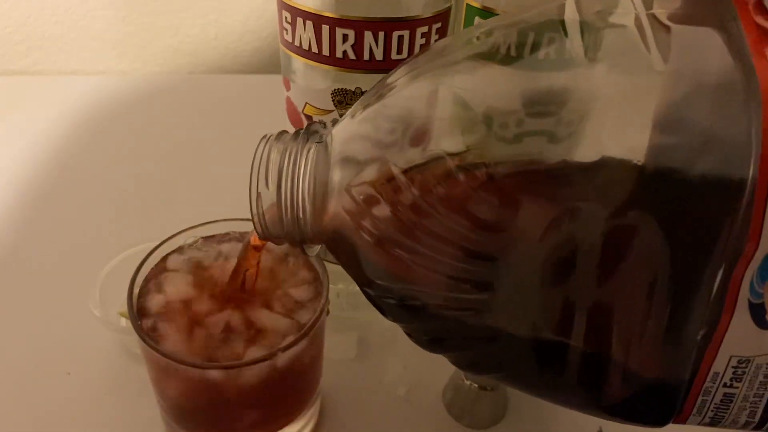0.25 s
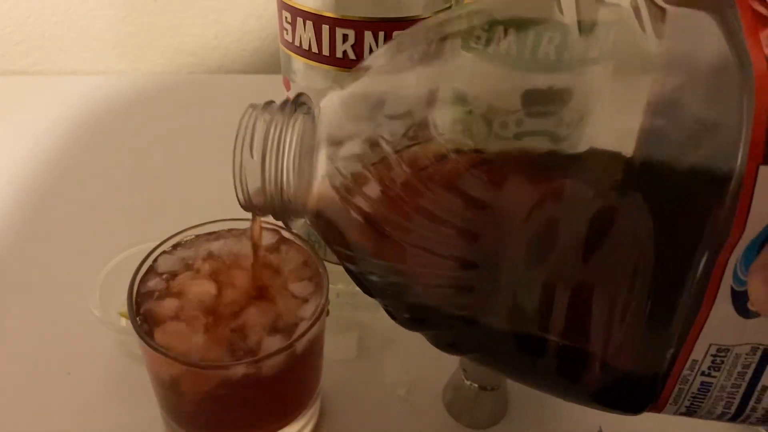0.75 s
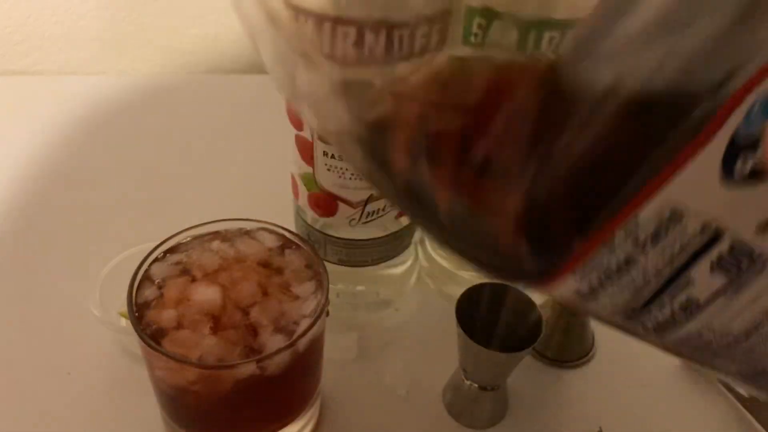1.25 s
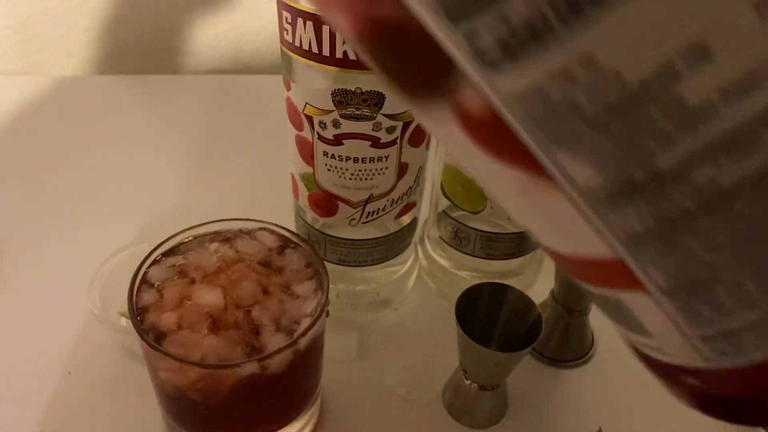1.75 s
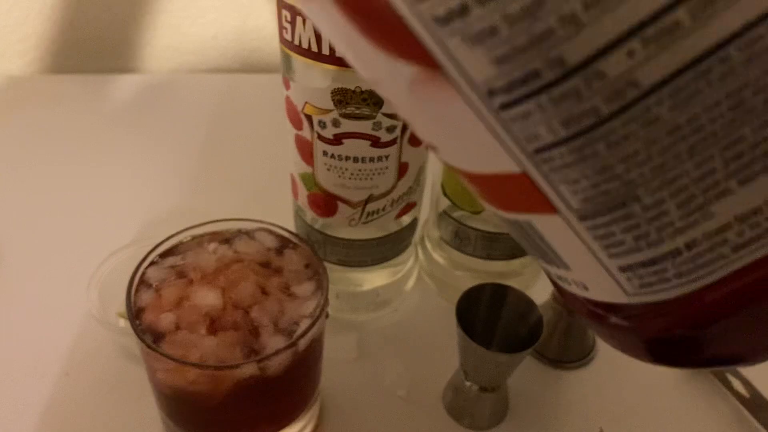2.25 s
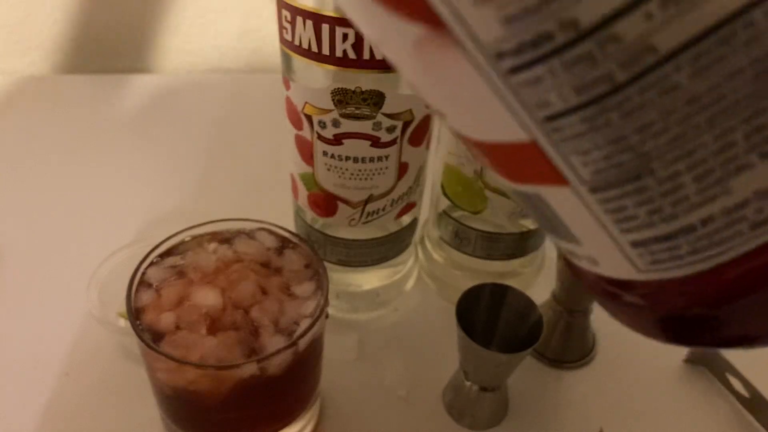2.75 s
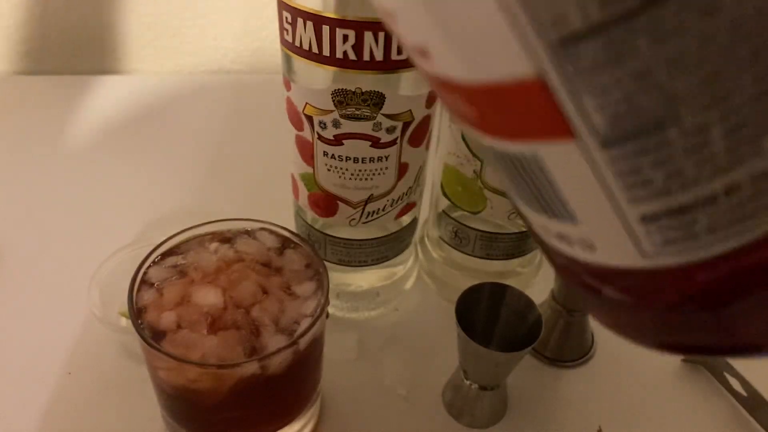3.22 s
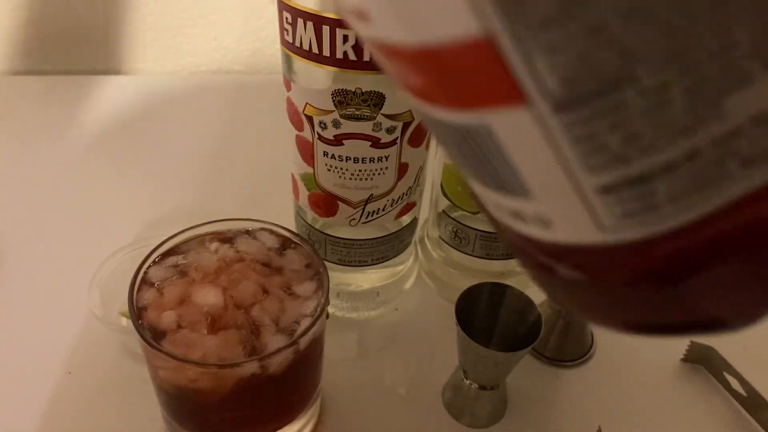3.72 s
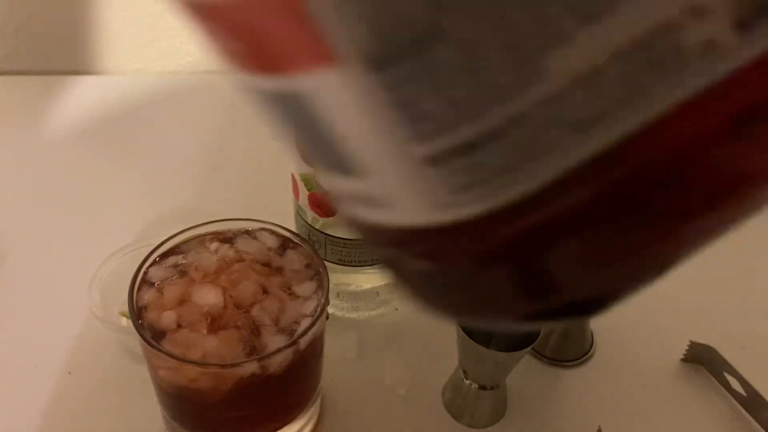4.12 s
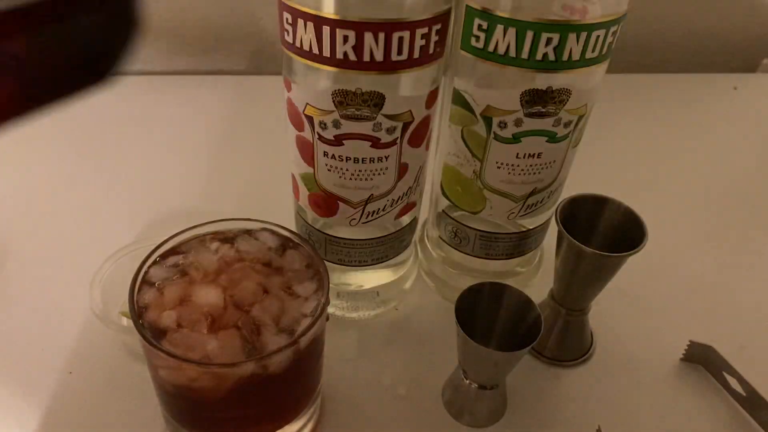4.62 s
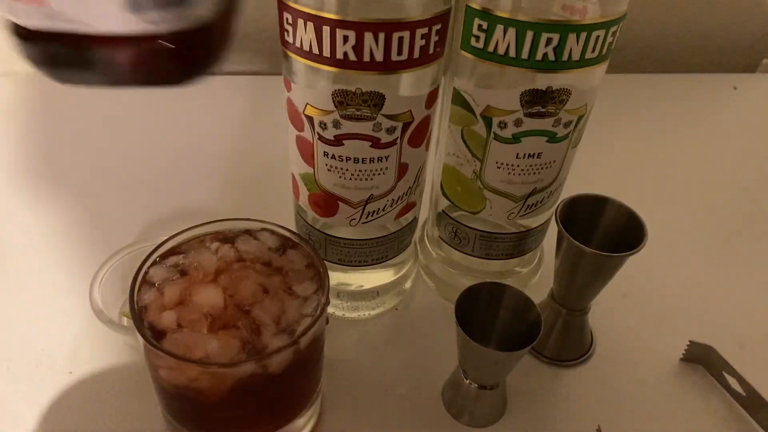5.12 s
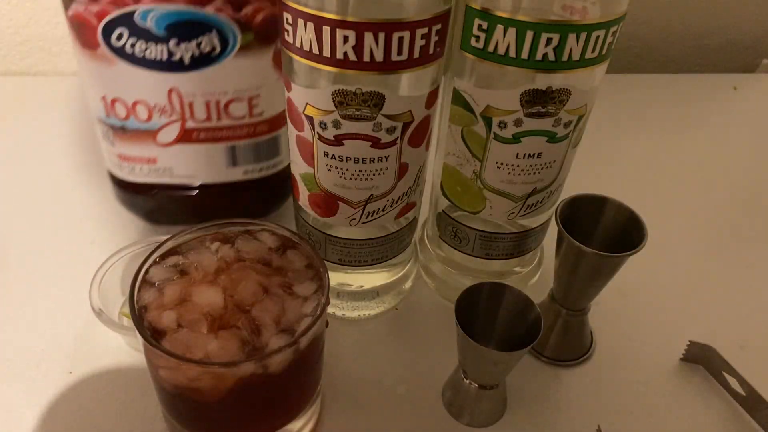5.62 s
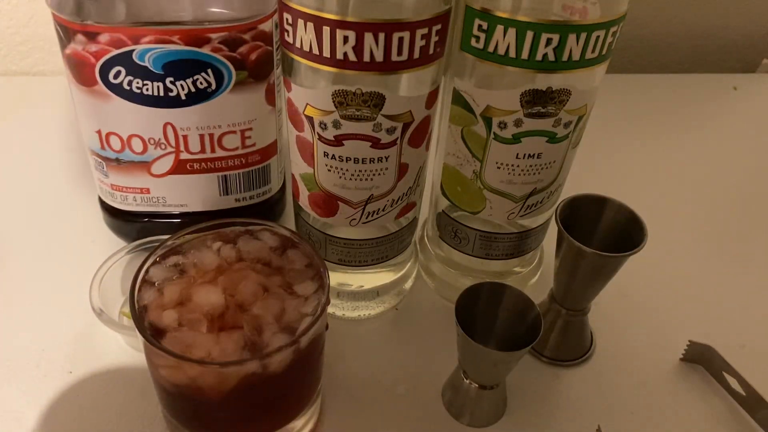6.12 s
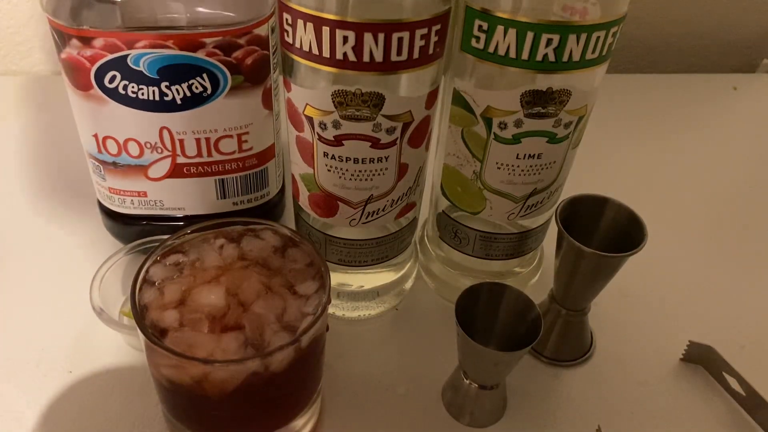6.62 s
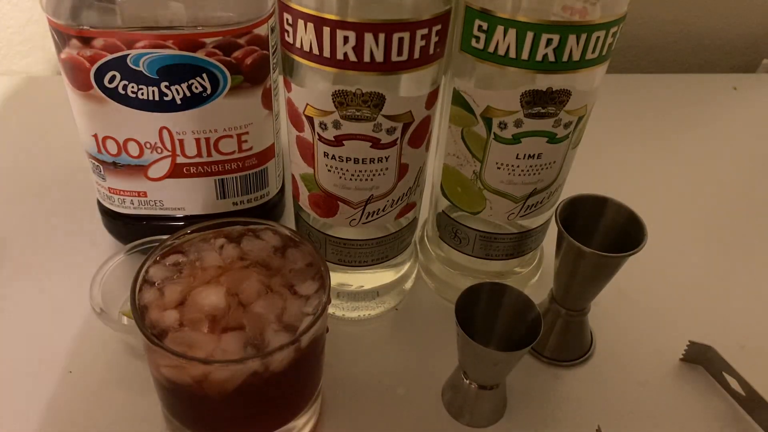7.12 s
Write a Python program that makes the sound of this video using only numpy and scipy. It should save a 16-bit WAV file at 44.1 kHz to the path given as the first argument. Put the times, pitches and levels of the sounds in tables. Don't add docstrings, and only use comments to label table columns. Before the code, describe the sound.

Heard close, slightly left: juice trickles over ice with bubbly plinks and crackles, then stops. Hands handle a plastic bottle, a cap clicks on, hollow knocks and skin rubs follow, and a hard twist ends in a bright snap. A brief pause with a dull creak, a low boom as the bottle lands, and several light ringing metal touches. A quiet fridge hums throughout the short-echoing room.

```python
import sys
import numpy as np
from scipy import signal
from scipy.fft import rfft, irfft
from scipy.io import wavfile

SR = 44100
rng = np.random.default_rng(int(sys.argv[2]) if len(sys.argv) > 2 else 0)


def rack_gain(trim_db):
    fader = np.asarray(trim_db, float)
    return 10 ** (fader / 20)


def digitize_waveform(pressure):
    field = np.atleast_2d(pressure).T
    bounded = np.clip(field, -1, 1)
    quanta = np.round(bounded * 32767).astype(np.int16)
    wavfile.write(sys.argv[1], SR, quanta)


N = 325017


def rms_one(x):
    return x / np.sqrt(np.mean(x ** 2) + 1e-20)


def in_time(rows, quiet_db=-130):
    s, *columns = np.transpose(rows)
    return [np.interp(np.arange(N) / SR, s, c, quiet_db, quiet_db) for c in columns]


def at_hz(points, hz):
    points_hz, level_db = np.transpose(points)
    return np.interp(np.log(hz + 1), np.log(points_hz), level_db)


def colour(x, points):
    gain = rack_gain(at_hz(points, np.fft.rfftfreq(N, 1 / SR)))
    return irfft(rfft(x) * gain, N)


def drift(rate):
    r = np.exp(-80 * np.pi * rate / SR)
    slow = signal.lfilter([1], [1, -2 * r, r * r], rng.standard_normal(N // 40 + 2002))[2000:]
    return np.interp(np.arange(N) / 40, np.arange(len(slow)), rms_one(slow))


def ring(x, hz, width_hz):
    r, w = np.exp(-np.pi * width_hz / SR), 2 * np.pi * hz / SR
    return signal.lfilter([0, np.sin(w)], [1, -2 * r * np.cos(w), r * r], x + 1e-18)


def width_of(t60):
    return np.log(1000) / np.pi / t60


def body(x, modes, spread_db=0., widen=0.9):
    out = 0
    for k, (hz, width_hz, db) in enumerate(modes):
        strength = rack_gain(db + spread_db * rng.standard_normal()) * (-1) ** k
        out = out + strength * ring(x, hz, width_hz * widen)
    return out


def burst(rise_s, fall_s, size=3200):
    t = np.arange(size) / SR
    swell = (1 - np.exp(-t / rise_s)) * np.exp(-t / fall_s)
    return rng.standard_normal(size) * swell * np.cos(np.pi / 2 * t / t[-1])


def bubble(hz, t60, rise, size=1500):
    t = np.arange(size) / SR
    tone = np.sin(2 * np.pi * hz * (t + rise * t ** 2))
    return tone * rack_gain(-60 * t / t60) * (1 - np.exp(-t / 0.00028))


def add(out, s, db, piece):
    i = round(s * SR)
    out[i:i + len(piece)] += (rack_gain(db) * piece / np.abs(piece).max())[:N - i]


# [f/Hz, likeness 0-1]
LIKENESS = [(60, 0.93), (150, 1), (380, 0.56), (950, 0.035), (2380, 0.24), (5980, 1), (15000, 0.055)]


def banded_noise(spectrum, patchy_db, rate, size=N):
    out, together = 0, drift(rate / 4)
    edges = 22 * 2 ** np.arange(0, 10, .5)
    white = rng.standard_normal((2, 2, size))
    for k, (low, high) in enumerate(zip(edges, edges[1:])):
        band = signal.butter(2, [low, high], "band", fs=SR, output="sos")
        mid, side = signal.sosfilt(band, white[k % 2])
        alike = np.clip(at_hz(LIKENESS, np.sqrt(low * high)), 0, 1)
        gain = rack_gain(patchy_db * (0.2 * together + drift(rate)))[:size]
        out = out + gain * (np.sqrt(1 + alike) * mid + np.sqrt(1 - alike) * side * [[1], [-1]])
    out = np.pad(out, [(0, 0), (0, N - size)])
    return rms_one(colour(out, spectrum)) * np.sqrt(size / N)


# [f/Hz, level/dB]
FLOOR = [(12, -56), (20, -4), (65, -0.5), (127, -11), (146, -8.5), (177, -19), (328, -19.5), (388, -23),
         (660, -25), (802, -31), (1760, -44.5), (2200, -38), (2750, -44.5), (3250, -55), (4000, -45),
         (7000, -47), (16000, -33.5)]
# [f/Hz, width/Hz, level/dB rms]
WHINE = [(178.6, 4.4, -69), (2080, 360, -94), (2430, 230, -89.5), (3170, 220, -91.5), (4620, 22, -92),
         (6780, 7.4, -96.5), (7340, 8.2, -100.5)]


def kitchen_floor():
    white, hz = rng.standard_normal((3, N)), np.fft.rfftfreq(N, 1 / SR)
    peaks = 0
    for centre_hz, width, db in WHINE:
        peaks = peaks + rack_gain(db) / np.sqrt(width) / (1 + ((hz - centre_hz) / width) ** 2)
    whine = 140 * irfft(rfft(white[0] + 0.88 * white[1:]) * peaks, N)
    hiss = banded_noise(FLOOR, patchy_db=0.67, rate=3.5)
    hiss = colour(hiss, [(9000, 4.5), (11500, -6.5), (15500, -11), (16000, -17)])
    return rack_gain(-59) * hiss + whine


# [f/Hz, level/dB per harmonic]
BUZZ = [(500, -23), (1000, -23), (1500, -24), (2300, -1), (2800, -12), (3200, -1.5), (3700, -10),
        (4600, -15.5), (7000, -15), (9000, -25)]
# [multiple, level/dB]
PANEL_LIFT = [(36, 12), (37, 14), (42, 12), (54, 8)]


def buzz():
    turns_hz, wander, scatter_db = 58.95, 0.00017, 5
    scatter, phase = rng.standard_normal(1025), rng.random(1025)
    for multiple, db in PANEL_LIFT:
        scatter[multiple] = db / scatter_db
    harmonic = np.arange(1025)
    level = rack_gain(at_hz(BUZZ, turns_hz * harmonic) + scatter_db * scatter) * (harmonic < 160)
    turn = irfft(level * np.exp(2j * np.pi * phase))
    angle = np.cumsum(turns_hz * (1 + wander * drift(0.79))) / SR
    angle = angle + np.array([[0], [.004]])
    wave = np.interp(angle % 1 * 2048, np.arange(2048), rms_one(turn))
    return rack_gain(-75 + 2.5 * drift(12.5)) * wave


def room(x):
    t60_s, cut_hz = 0.23, 4540
    t = np.arange(SR // 2) / SR
    low, high = rng.standard_normal((2, 2, len(t))) * (1 - np.exp(-t / 0.00093))
    band = signal.butter(2, [120, cut_hz], "band", fs=SR, output="sos")
    low = signal.sosfilt(band, low) * rack_gain(-60 * t / t60_s)
    tail = low + 0.33 * high * rack_gain(-60 * t / t60_s / 0.84)
    tail = tail / np.sqrt(np.sum(tail ** 2) / 2)
    return signal.fftconvolve(x[None], tail, axes=1)[:, :N]


# [f/Hz, level/dB]
LEAN = [(60, -2.5), (130, 13), (290, 2), (640, 12), (1410, 3.5), (3100, 10), (6820, 1), (15000, -3.5)]


def lean(x, share, lag_s):
    hz = np.fft.rfftfreq(N, 1 / SR)
    early = np.exp(1j * np.pi * hz * lag_s / (1 + (hz / 1500) ** 2))
    half = rack_gain(share * at_hz(LEAN, hz) / 2) * early
    return irfft(rfft(x) * np.array([half, 1 / half]), N)


# [t/s, peak level/dB, upper modes level/dB]
CLINKS = [
    (6.3395, -47.5, -19.5),
    (6.5774, -28, -8.5),
    (6.6702, -34, -10),
    (6.755, -30, -9),
    (6.9107, -41.5, -8.5),
    (6.9396, -38.5, -15),
    (6.9714, -63, 5),
    (7.1367, -38.5, -13.5),
    (7.1906, -37, -13),
    (7.3544, -54.5, -17),
]
STEEL_HZ = [2164, 2293, 3806, 4264, 5150, 5911, 6304, 7075, 7327, 7714, 8554, 9600, 10430, 11560]
# [level/dB, t60/s]
STEEL = [(2, 0.28), (-6.5, 0.35), (-9.5, 0.17), (-7, 0.15), (-17, 0.067), (-27, .09), (-33, 0.05),
         (-15.5, 0.095), (-24, .08), (-28, 0.092), (-24.5, 0.15), (-16, 0.091), (-25, 0.086), (-28, 0.064)]


def steel():
    out, click = np.zeros(N), np.eye(1, 14000)[0]
    for s, db, upper_db in CLINKS:
        clink = 0
        for hz, (level_db, t60) in zip(STEEL_HZ, STEEL):
            upper = hz > 3000
            chance_db = .7 + .5 * upper + 2. * (hz > 5000)
            lift_db = (upper_db + 9.0) * upper + chance_db * rng.standard_normal()
            clink = clink + rack_gain(level_db + lift_db) * ring(click, hz, width_of(t60))
        add(out, s, db, clink)
        add(out, s, db - 2.5, -ring(ring(click[:2000], 1560, 460), 1330, 950))
        add(out, s, db - 22.0, ring(burst(0.0003, 0.009), 6000, 3000))
    return out


def shimmer():
    out = np.zeros(N)
    for s, db, upper_db in CLINKS:
        hiss = burst(0.00094, 0.031, size=6000)
        blur = 0.65 * ring(hiss, 5500, 200) + ring(hiss, 5600, 400) + 1.7 * ring(hiss, 7500, 450)
        add(out, s, db - 17.5 + 0.35 * upper_db, blur)
    return out


# [t/s, peak level/dB, ring f/Hz, rattle level/dB]
THUDS = [
    (5.88, -22, 151, -17),
    (5.922, -49, 61.4, -7),
    (5.964, -38, 152, -19),
    (6.006, -44.5, 180, -16),
    (6.087, -47.5, 114, -4.5),
    (6.203, -49.5, 61.9, -6.5),
    (6.292, -46, 190, -10),
    (6.386, -31.5, 188, -10),
]


def counter():
    out, t = np.zeros(N), np.arange(8000) / SR
    for s, db, hz, rattle_db in THUDS:
        rough = burst(0.01, 0.018, size=8000)
        push = (.003 - t) / 0.00078 * np.exp(-((t - .003) / 0.00077) ** 2)
        blow = push + .5 * rough
        boom = ring(blow, hz, 36) + 0.92 * ring(blow, 263, 84) + 0.63 * ring(blow, 427, 160)
        add(out, s, db, boom + 1.26 * ring(rough, 59.2, 9.1))
        add(out, s, db + rattle_db, ring(ring(burst(0.001, 0.018), 640, 2300), 900, 4100))
    return out


# [t/s, level/dB, slips per s]
CREAK = [
    (4.99, -78, 90),
    (5.04, -55, 85),
    (5.16, -48.5, 78),
    (5.23, -65, 80),
    (5.324, -67, 81),
    (5.336, -68, 77),
    (5.45, -83, 114),
]
# [f/Hz, width/Hz, level/dB]
CREAK_BODY = [(265, 69, -6.5), (340, 84, -4.5), (484, 123, -8), (716, 99, -12.5), (960, 230, -11),
              (1770, 220, -9.5)]


def creak():
    db, per_s = in_time(CREAK)
    turns = np.floor(np.cumsum(np.abs(per_s) * (1 + 0.075 * drift(40))) / SR)
    slips = np.diff(turns, prepend=0) * rack_gain(2.0 * rng.standard_normal(N))
    slips = slips + 0.1 * rng.standard_normal(N)
    return rack_gain(db) * rms_one(ring(body(slips, CREAK_BODY), 520, 1670))


# [t/s, peak level/dB, centre f/Hz, width/Hz, length/s]
SCUFFS = [(1.449, -41.5, 1550, 1200, 0.0041), (1.72, -37, 1500, 120, 0.0086),
          (1.955, -29.5, 2140, 250, 0.002), (1.956, -30, 736, 130, 0.0039), (2.208, -45, 3080, 500, 0.0039),
          (2.513, -49.5, 1790, 900, 0.032), (2.69, -34.5, 1150, 300, 0.0061),
          (2.872, -53, 1300, 500, 0.0035), (2.9, -44, 1930, 200, 0.002), (2.938, -50, 1290, 1500, 0.0017),
          (3.057, -51.5, 2060, 400, 0.085), (3.095, -42.5, 2150, 1200, 0.14),
          (3.134, -30, 3400, 1500, 0.0042), (3.175, -37.5, 2010, 250, 0.0039),
          (3.189, -44, 2100, 500, 0.0078), (3.351, -44.5, 2800, 3500, 0.0036),
          (3.377, -32, 2580, 3000, 0.0027), (3.386, -29.5, 740, 250, 0.0031),
          (3.732, -52.5, 2980, 1500, 0.0045), (4.208, -43, 2670, 800, 0.0055),
          (4.316, -44, 3020, 3000, 0.017), (4.342, -42, 4020, 4000, 0.0055),
          (4.372, -31, 3000, 3000, 0.0028), (4.246, -52, 2200, 1200, 0.003), (4.16, -54, 11000, 5000, .004),
          (4.423, -27.5, 3430, 2500, 0.0012), (5.882, -35, 1040, 500, 0.0065),
          (6.375, -49, 2000, 2010, 0.011), (1.779, -30.5, 744, 180, 0.0033), (4.43, -53, 3120, 1500, 0.04),
          (1.719, -33, 3250, 400, 0.0022), (2.041, -40, 790, 250, 0.0051)]
# [t/s, peak level/dB, centre f/Hz, width/Hz, length/s]
NUDGES = [
    (5.333, -48, 350, 66, .02),
    (6.7, -47.5, 330, 110, 0.015),
    (6.6, -56, 5600, 1200, 0.0043),
    (7.2, -49, 1400, 1400, 0.027),
    (7.7, -54, 5700, 6800, 0.011),
]


def scuffs(rows):
    out = np.zeros(N)
    for s, db, hz, width_hz, length_s in rows:
        add(out, s, db, ring(burst(0.35 * length_s, length_s, size=6000), hz, width_hz))
    return out


# [t/s, level/dB]
RUB = [
    (1.6, -71),
    (2.12, -39.5),
    (2.29, -73),
    (2.69, -43.5),
    (3.13, -48),
    (3.52, -58),
    (4.21, -52.5),
    (4.34, -32),
    (4.7, -75),
]
# [f/Hz, width/Hz, level/dB]
WALL = [(435, 40, 12.5), (738, 2.5, -9), (930, 23.2, -26)]
CAP = [(1330, 138, 7.5), (1576, 27, -5), (1937, 39, -2.5), (2560, 62.6, -36), (2650, 180, -30.5),
       (3395, 61, -10.5)]
JUICE = [(70, 50, 5.5), (120, 58, 4), (180.5, 29.6, -6.5), (207, 67, -7)]


def rub():
    press_db, = in_time(RUB)
    slips = rng.standard_normal(N) * rack_gain(4.6 * drift(79))
    cap = body(slips, CAP, widen=6.0) + 1.05 * ring(slips, 3200, 2800)
    plastic = body(slips, WALL, widen=7.3) + rack_gain(0.5) * cap
    juice_db = -57 + 0.29 * (press_db + 52.5)
    return rack_gain(juice_db) * rms_one(body(slips, JUICE)) + rack_gain(press_db - 12.5) * rms_one(plastic)


# [t/s, wall peak level/dB, ring f/Hz, cap rattle level/dB re wall]
GRIPS = [(1.778, -34, 737, -6.5), (2.039, -32, 364, -5), (2.069, -38, 461, -9), (2.093, -42.5, 706, 7.5),
         (2.113, -41.5, 353, -12), (2.189, -44.5, 320, -13), (2.209, -37, 462, 2), (2.501, -36, 413, -5),
         (2.511, -35, 620, -7), (2.526, -40, 340, -6), (2.579, -42.5, 331, -20), (2.614, -36.5, 411, -40),
         (2.682, -38, 250, 4.5), (2.7, -31, 479, -15), (2.723, -48, 500, -29), (2.897, -41.5, 464, -24),
         (2.943, -37.5, 456, -34), (3.072, -44, 360, -20), (3.107, -43.5, 590, -22),
         (3.198, -37, 430, -0.5), (3.355, -27, 422, -1), (3.382, -23, 738, 0), (3.408, -41.5, 460, 0),
         (3.451, -39.5, 296, -6), (3.475, -33, 404, -13), (3.735, -59, 243, 8.5), (3.817, -44.5, 265, -18),
         (3.838, -49, 494, -3.5), (3.94, -44, 282, -26), (3.959, -37, 374, -13.5)]
# [t/s, wall peak level/dB, ring f/Hz, snap level/dB re wall, cap rattle level/dB re wall]
CLACKS = [(1.45, -57.5, 1750, 23.5, -6), (1.72, -25, 420, -5, -8), (1.956, -33.5, 706, -10.5, 2),
          (3.135, -25, 507, -24.5, 0), (3.179, -31, 470, -13, 3.5), (3.495, -45.5, 407, 3, 3),
          (4.154, -48.5, 714, -31, 4), (4.162, -45, 505, -12.5, -7), (4.21, -50.5, 480, 3.5, 7),
          (4.225, -45.5, 496, -12.5, 2.5), (4.243, -36, 530, -8, 1), (4.318, -30.5, 637, 3, -4),
          (4.321, -35, 374, 8.5, -2), (4.34, -31, 256, 6, -7), (4.365, -42, 257, 14, -5),
          (4.373, -32, 254, 3, -6), (4.384, -42.5, 340, -12, -3), (4.398, -40, 256, 10, -14),
          (4.427, -35.5, 303, 5, -8)]
# [f/Hz, level/dB per Hz]
SNAP = [(1800, -17), (3000, -16.5), (5000, -4.5), (6700, -6.5), (8000, -6), (10500, -5), (13500, -19),
        (15500, -6), (16500, -23)]
# [t/s, peak level/dB]
SLOSHES = [(1.717, -33), (1.779, -44), (1.803, -36.5), (2.047, -26.5), (2.075, -36), (2.111, -27),
           (2.189, -40.5), (2.214, -39), (2.507, -33), (2.614, -33.5), (2.684, -31.5), (3.069, -46),
           (3.106, -54), (3.351, -50), (3.408, -34), (3.449, -36), (3.734, -30), (3.958, -54), (4.154, -50),
           (4.225, -42), (4.246, -35.5), (4.321, -30), (4.364, -39)]
# [t/s, peak level/dB, centre f/Hz, length/s]
TICKS = [
    (1.4496, -29, 4900, 0.0005),
    (1.719, -16.5, 3400, 0.00035),
    (3.482, -40.5, 2730, 0.0072),
    (3.496, -35.5, 3140, 0.0041),
    (4.235, -46, 5000, 0.0017),
    (4.421, -17, 6700, 0.0012),
    (5.877, -45.5, 3260, 0.0027),
    (4.4232, -13, 6550, 0.00063),
    (4.681, -45.5, 7300, 0.00026),
]


def bottle():
    dull, snaps = np.zeros(N), np.zeros(N)
    knocks = [(s, db, hz, rattle_db, -31) for s, db, hz, rattle_db in GRIPS]
    knocks += [(s, db, hz, rattle_db, snap_db) for s, db, hz, snap_db, rattle_db in CLACKS]
    for s, db, hz, rattle_db, snap_db in knocks:
        soft = np.clip(-snap_db / 40, .1, 1)
        blow = burst(0.00062 * soft, 0.011 * soft + 0.0028)
        late_s = .003 + 0.0024 * soft
        push = np.exp(-((np.arange(len(blow)) / SR - late_s) * hz * 4.2) ** 2) + soft * blow
        wall = ring(push, hz, 0.092 * hz) + 0.19 * ring(push, hz, 20.4)
        wall = wall + 1.27 * ring(blow, 516, 150) + 2.37 * ring(blow, 693, 154)
        add(dull, s, db + 3.0, wall)
        rattle = body(blow, CAP, spread_db=5.5, widen=5.9) + 0.19 * ring(blow, 1240, 1600)
        add(dull, s, db + rattle_db, rattle)
        snap_tail = signal.lfilter([.4], [1, -.6], burst(0.0041, 0.052))
        add(snaps, s, db + snap_db, burst(0.0017, 0.0019) + 0.096 * snap_tail)
    thuds = [(s, db - 11.5) for s, db, *_ in knocks]
    for s, db in SLOSHES + thuds:
        add(dull, s, db, body(burst(0.0027, 0.0083), JUICE, spread_db=2.0))
    dull += rack_gain(-1.5) * rms_one(colour(snaps, SNAP)) * np.sqrt(np.mean(snaps ** 2))
    for s, db, hz, length_s in TICKS:
        crack = burst(0.66 * length_s, length_s)
        squeak = ring(crack, hz, max(300, .8 / length_s))
        add(dull, s, db, 0.33 * squeak + 0.00053 / length_s * np.diff(crack, prepend=0))
    return dull


# [t/s, peak level/dB]
CRACKLE = [(0.0623, -42), (0.1017, -43), (0.1361, -48), (0.1635, -49), (0.188, -43), (0.214, -45),
           (0.2139, -35), (0.2518, -47), (0.2758, -47), (0.3077, -36), (0.3192, -44), (0.3676, -51),
           (0.368, -41), (0.4, -36), (0.4183, -43), (0.4189, -32), (0.4645, -40), (0.4888, -42),
           (0.5342, -48), (0.5591, -53), (0.5861, -51), (0.6255, -41), (0.6444, -45), (0.6828, -51),
           (0.702, -40), (0.7632, -44)]


def crackle():
    out = np.zeros(N)
    for s, db in CRACKLE:
        add(out, s, db, ring(np.diff(burst(.0002, 0.00051, size=601)), 5500, 4500))
    return out


# [t/s, peak level/dB, f/Hz]
DROPLETS = [(0.049, -57, 3200), (0.1, -47, 3850), (0.135, -52, 2260), (0.188, -47, 4400),
            (0.268, -44, 3270), (0.299, -56, 3400), (0.36, -43, 6500), (0.3676, -41, 6560),
            (0.534, -47, 1480), (0.561, -53, 1130), (0.5861, -47, 4400), (0.6474, -47, 6700),
            (0.6707, -44, 3250), (0.683, -47, 2540), (0.8415, -71, 4350), (0.8495, -57, 4310),
            (0.8714, -59, 3300), (0.8949, -51, 4200), (0.94, -56, 1550), (0.974, -37, 14700),
            (0.997, -50, 9000), (1.086, -54, 13000), (1.1063, -51, 3800), (1.143, -57, 1460),
            (1.252, -39, 9600), (1.3169, -62, 2050)]


def droplets():
    out = np.zeros(N)
    for s, db, hz in DROPLETS:
        click = np.diff(burst(0.0002, 0.00052, size=1501))
        add(out, s, db, bubble(hz, 0.018 * (2000 / hz) ** 0.34, rise=1.6) + 0.58 * click)
    return out


# [t/s, peak level/dB, from f/Hz, to f/Hz, length/s]
GLIDES = [(0.003, -52.5, 1550, 2650, 0.069), (0.064, -55, 1330, 1496, 0.086),
          (0.107, -48.5, 2900, 1516, 0.034), (0.27, -47, 4500, 5400, 0.014), (0.352, -64, 1500, 2050, .035),
          (0.365, -51, 4100, 4700, 0.013), (0.425, -48.5, 2500, 3370, 0.042), (0.45, -59, 4150, 4740, .04),
          (1.125, -69, 1380, 1390, 0.028), (.42, -46, 7100, 7950, .03), (0.255, -50.5, 1875, 1890, 0.023),
          (.556, -52, 2270, 2780, .022)]


def glides():
    out = np.zeros(N)
    for s, db, from_hz, to_hz, length_s in GLIDES:
        part = np.arange(int(length_s * SR)) / (length_s * SR)
        flutter = 1 + 2.9 * signal.lfilter([.06], [1, -.95], rng.standard_normal(4000))[:len(part)]
        tone = np.sin(2 * np.pi * np.cumsum(from_hz + (to_hz - from_hz) * part) / SR)
        add(out, s, db, np.sin(np.pi * part) ** 0.21 * flutter * tone)
    return out


# [t/s, f/Hz, level/dB]
GLASS_AIR = [
    (0, 719, -68),
    (.28, 726, -65.5),
    (.4, 860, -74),
    (.45, 1117, -74),
    (.75, 1167, -79),
    (.9, 1110, -101),
]


def glass_air():
    hz, db = in_time(GLASS_AIR)
    level = rack_gain(db + 4.0 * drift(17.0))
    return level * np.sin(2 * np.pi * np.cumsum(hz + 45 * drift(48)) / SR)


# [t/s, peak level/dB, f/Hz]
PLINKS = [(0.068, -47, 1360), (0.0605, -40, 2660), (0.073, -41, 2560), (0.1124, -32, 2660),
          (0.1225, -48, 2660), (0.1533, -36.5, 1390), (0.2508, -45, 3150), (0.2754, -42, 3340),
          (0.3186, -36, 6470), (0.3304, -41, 6500), (0.422, -40, 2530), (0.3774, -41, 6800),
          (0.3944, -44, 6250), (0.4103, -31, 7640), (0.4186, -36, 7340), (0.4504, -44, 4250),
          (0.4894, -34.5, 4580), (0.5361, -43.5, 4340), (0.5577, -40.5, 4240), (0.625, -40, 7260),
          (0.6813, -39.5, 4310), (0.7618, -43.5, 2560), (0.8101, -56, 3680), (1.0197, -48.5, 1420),
          (1.115, -53, 1390), (1.2815, -58, 3440), (1.3307, -56.5, 3850)]
ICE_TICKS = [(0.164, -33.5, 1620), (0.208, -31, 7260), (0.4337, -36, 7250), (0.4645, -30, 4560),
             (0.7028, -51, 2530), (0.7183, -52, 3360), (0.9174, -41, 3900), (0.925, -35.5, 6960),
             (0.9575, -41, 3420), (1.0077, -37, 6900), (1.071, -52, 3570), (1.201, -47, 7250),
             (1.2188, -45.5, 3580), (1.2516, -67, 2220), (1.4037, -44, 3100)]


def plinks_and_ice():
    out = np.zeros(N)
    for rows, tick_db in [(PLINKS, -10), (ICE_TICKS, 9)]:
        for s, db, hz in rows:
            tick = rack_gain(tick_db) * np.diff(burst(0.00031, 0.00077, size=1501))
            rough = 0.85 + 1.13 * signal.lfilter([.2], [1, -.9], rng.standard_normal(1500))
            add(out, s, db, bubble(hz, 0.028 * (2000 / hz) ** 0.52, rise=2.2) * rough + tick)
    return out


# [f/Hz, level/dB per Hz]
SPLASH = [(290, -68), (500, -23), (710, -19), (952, -7), (1390, -1.5), (2100, -8.5), (2610, 1),
          (5510, -1.5), (7380, -3.5), (8670, 2), (10200, -5), (15100, -28), (16500, -30)]
# [f/Hz, width/Hz, level/dB]
POCKETS = [(1390, 78, -3), (2660, 160, 0), (3030, 130, -4), (4580, 520, -4), (6500, 150, -4),
           (7800, 200, -3)]


def bubble_swarm():
    swarm, pour_end_s = np.zeros(N), 1.6
    for when, pitch, strength, life in rng.random((800, 4)):
        hz = 1150 * 7.0 ** pitch
        pocket_hz = min(POCKETS, key=lambda p: abs(np.log(p[0] / hz)))[0]
        hz = hz ** 0.5 * pocket_hz ** .55
        cycles = 5 + 70 * life ** 3
        add(swarm, pour_end_s * when, at_hz(SPLASH, hz) + 15 * strength ** 2, bubble(hz, cycles / hz, rise=3.8))
    fade_db = -58 - 15 * np.arange(N) / SR
    return swarm / np.std(swarm[:62000]) * rack_gain(fade_db)


# [t/s, level/dB]
POUR = [
    (0.0, -47.5),
    (0.158, -45.5),
    (0.18, -41.5),
    (0.418, -42.5),
    (0.778, -52.5),
    (1.42, -67),
]


def splash():
    splash_db, = in_time(POUR)
    noise = banded_noise(SPLASH, patchy_db=4.0, rate=200, size=66000)
    return rack_gain(splash_db - 14.5) * noise * rack_gain([[1.5], [-1.5]])


# [f/Hz, level/dB]
HELD_ECHO = [(500, 0), (1500, -2), (3500, -5), (5500, -17), (15000, -16)]


def scene():
    background = kitchen_floor() + buzz()
    clinks = steel() + shimmer()
    far = creak() + counter() + scuffs(NUDGES)
    held = bottle() + rub() + scuffs(SCUFFS)
    juice = plinks_and_ice() + bubble_swarm() + glass_air() + glides() + droplets() + crackle()
    direct = lean(held, 0.74, 0.00029) + lean(juice, 0.85, 0.00022) + lean(far + clinks, 0.47, .0001)
    sent = rack_gain(-12.5) * colour(held, HELD_ECHO) + rack_gain(-9.5) * juice
    sent = sent + rack_gain(-5.5) * far + rack_gain(-11.0) * clinks
    return direct + room(sent) + splash() + background


def top_cut(x):
    return signal.sosfilt(signal.butter(12, 17040, fs=SR, output="sos"), x)


def record(dry):
    shared_hz, turn_hz, cutoff_hz = 6900, 4330, 15900
    hz, (left, right) = np.fft.rfftfreq(N, 1 / SR), rfft(dry)
    turn = 2 * np.pi * np.maximum(hz - shared_hz, 0) / turn_hz
    turn = np.exp(-.5j * (turn + 0.25 * np.sin(-2 * turn)))
    shared = np.clip((hz - 5900) / 500, 0, .95)
    right = right + shared * (left - right)
    left = left * rack_gain(-.4 * shared)
    both = np.array([left * turn, right / turn])
    both = both / (1 + (hz / cutoff_hz) ** 40) / (1 + (42 / (hz + 1)) ** 3)
    return top_cut(irfft(both, N))


dry = scene()
out = record(dry)
digitize_waveform(out)
```